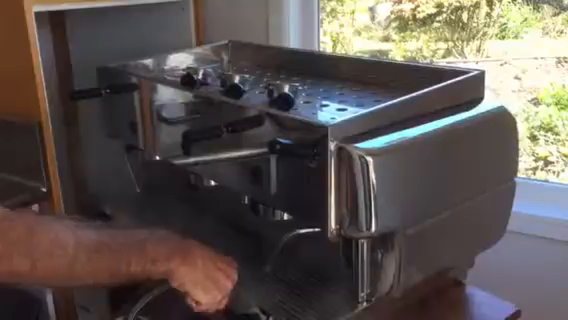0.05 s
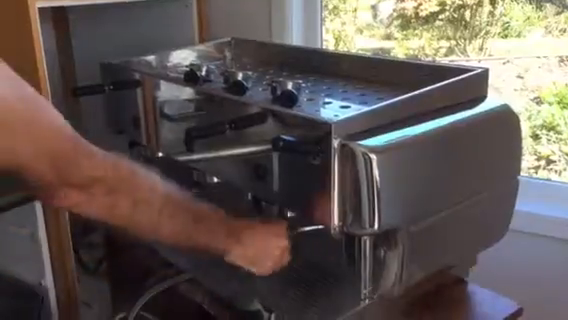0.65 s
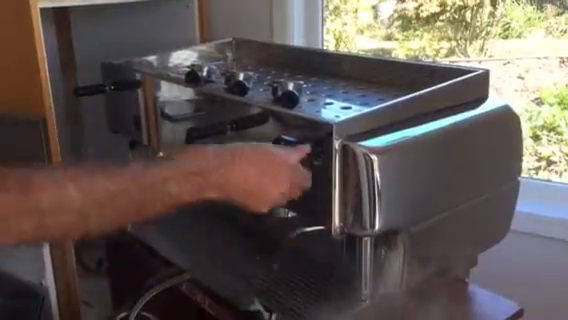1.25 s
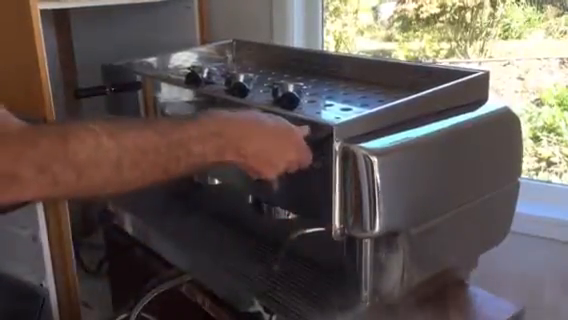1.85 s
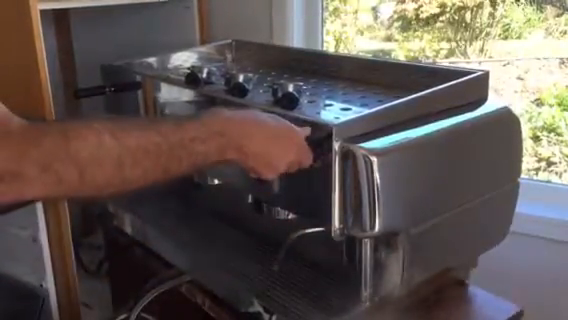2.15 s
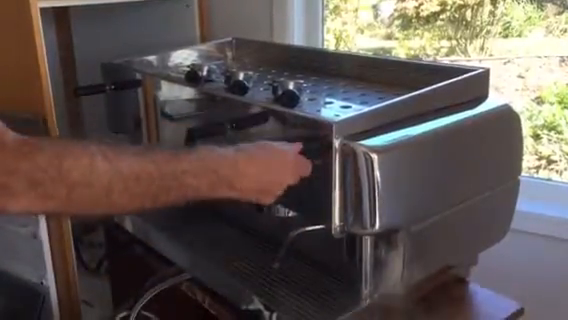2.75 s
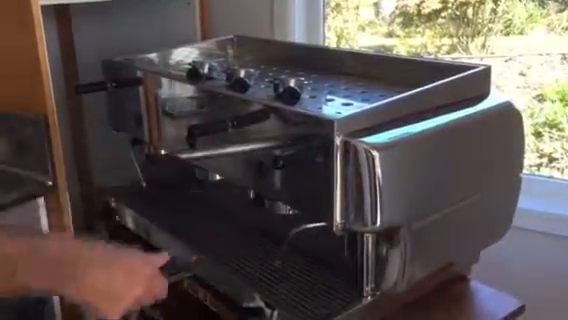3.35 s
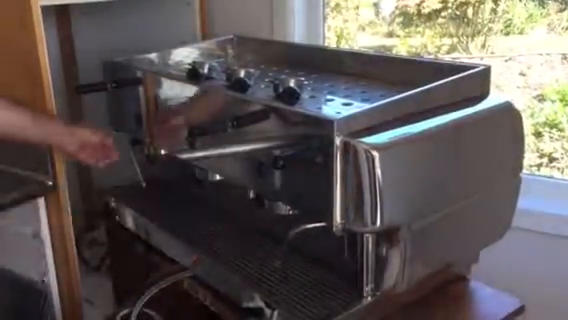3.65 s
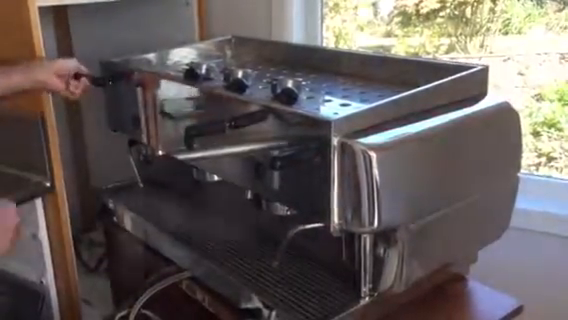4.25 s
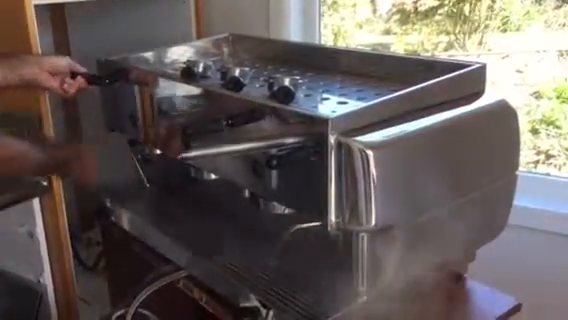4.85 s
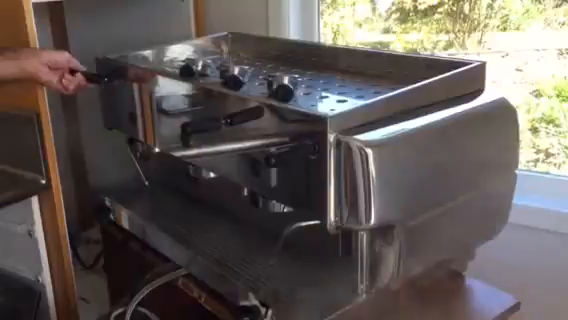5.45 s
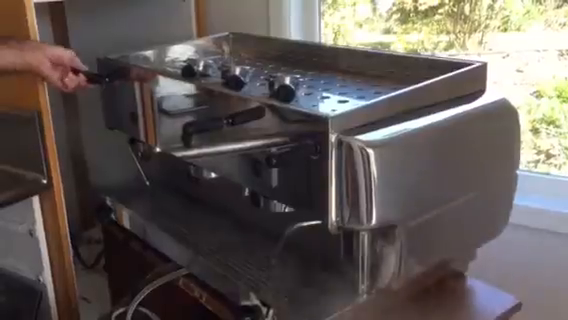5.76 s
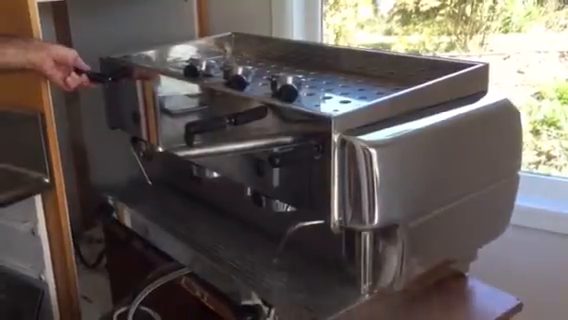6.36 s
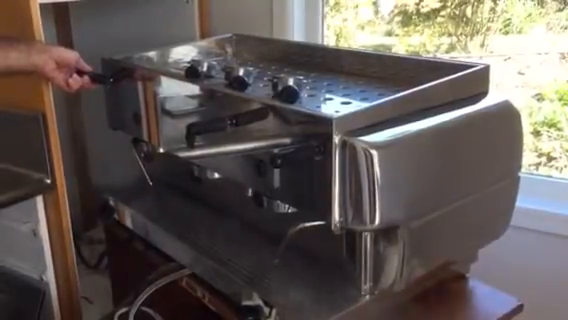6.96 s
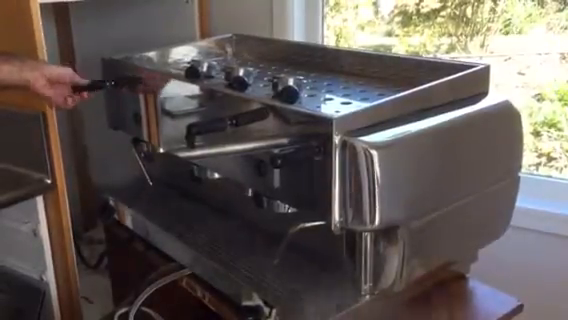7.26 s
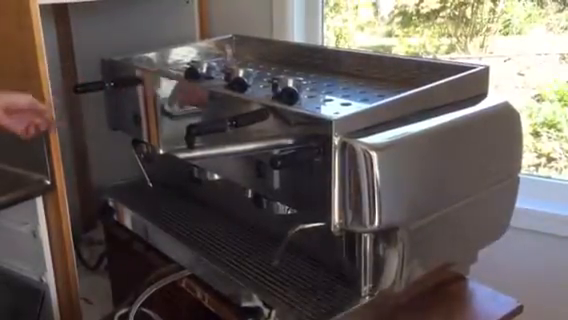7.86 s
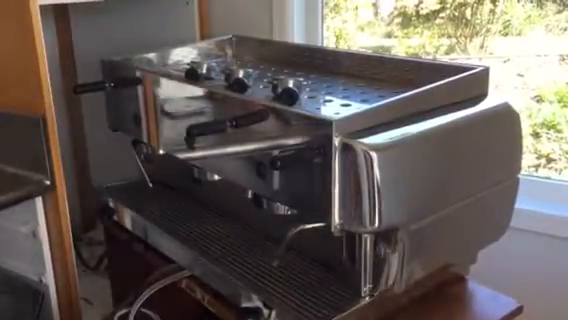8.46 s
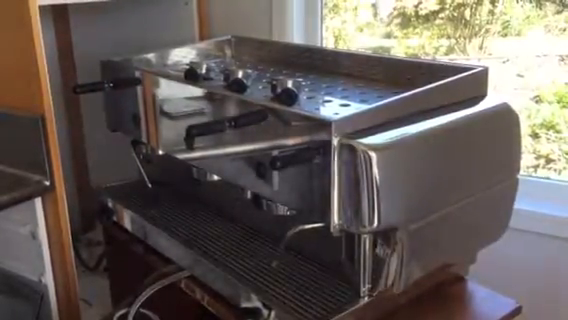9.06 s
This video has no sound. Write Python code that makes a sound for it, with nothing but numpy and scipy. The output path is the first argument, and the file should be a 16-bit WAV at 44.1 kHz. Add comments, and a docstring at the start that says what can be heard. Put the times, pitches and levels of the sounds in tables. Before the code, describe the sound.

An espresso machine lets off two loud jets of hissing steam, the second spitting water at first, with brief valve squeaks and pipe thuds.

```python
"""Espresso machine letting off steam

In a small hard room, steam roars from a tap until it is shut. A lever then lets out a second jet,
which spits water, clears to a bright hiss and closes with a cough. Slugs of water thud in the pipes,
the steel case booms under the jets, and the valves squeak as the pressure drains.
At the end the boiler is left simmering, and there are three light knocks on wood."""
import sys
import numpy as np
from scipy import signal
from scipy.fft import rfft, irfft, next_fast_len
from scipy.io import wavfile
from scipy.ndimage import map_coordinates

SR = 44100
rng = np.random.default_rng(int(sys.argv[2]) if len(sys.argv) > 2 else 0)


def generate_wav(sig):
    """Save sig (samples, or channels by samples) to the path in sys.argv[1] as 16-bit PCM at SR."""
    pcm = np.round(np.clip(np.atleast_2d(sig).T, -1, 1) * 32767).astype(np.int16)
    wavfile.write(sys.argv[1], SR, pcm)


N = 401310
TIME = np.arange(N) / SR

def amp(db):
    """Turn decibels into a gain to multiply by."""
    return np.exp(np.asarray(db) * np.log(10) / 20)

def unit(x):
    """Scale a sound to an average power of 1."""
    return x / np.sqrt(np.mean(x ** 2) + 1e-20)

def along(points, hz):
    """Read between (frequency, value) points, with octaves evenly spaced."""
    f, values = np.transpose(points)
    return np.interp(np.log(hz + 1), np.log(f + 1), values)

def since(s):
    """Seconds gone by since time s, zero before it."""
    return np.maximum(TIME - s, 0)

def wobble(rate):
    """A smooth curve through `rate` random values a second."""
    coarse = np.arange(0, N + 32, 32)
    curve = map_coordinates(rng.standard_normal(int(N * rate / SR) + 4), [coarse * rate / SR])
    return np.interp(np.arange(N), coarse, curve)

def burst(s, attack, t60):
    """A loudness curve that rises at time s and dies away; t60 is the time to fade by 60 dB."""
    out = np.zeros(N)
    start = round(s * SR)
    t = np.arange(min(N - start, round(2 * t60 * SR))) / SR
    out[start:start + len(t)] = (1 - np.exp(-t / attack)) * amp(-60 * t / t60)
    return out

def surge(s, rise, fall):
    """A loudness curve that swells to 1 at time s and falls off again."""
    t = TIME - s
    return np.exp(np.maximum(np.minimum(t / rise, -t / fall), -50))

def blend(a, b, share):
    """Fade from a (share 0) to b (share 1) at even power."""
    share = np.clip(share, 0, 1)
    return np.sqrt(1 - share) * a + np.sqrt(share) * b

def filtered(x, response):
    """Turn each frequency of x up or down by the gain response(frequency)."""
    size = next_fast_len(N + SR // 2)
    return irfft(rfft(x, size) * response(np.fft.rfftfreq(size, 1 / SR)), size)[..., :N]

def rush(colour, peaks=()):
    """Noise of power 1. Its colour sets the balance of low and high; peaks lift narrow bands."""
    size = next_fast_len(N)
    f = np.fft.rfftfreq(size, 1 / SR)
    peak_power = sum(3 * amp(db) ** 2 / (1 + (2 * (f - hz) / width) ** 2) for hz, width, db in peaks)
    shape = amp(along(colour, f)) * np.sqrt(1 + peak_power)
    real, imag = rng.standard_normal((2, len(f)))
    return unit(irfft((real + 1j * imag) * shape, size)[:N])

# Colours of the still room and the boiler: (frequency [Hz], relative level [dB])
AIR_COLOUR = [(25, -29.5), (60, -13.5), (100, -9), (145, -17.5), (222, -8.5), (300, -17.5), (500, -17),
              (1500, -24), (2400, -24), (3200, -27), (6000, -29.5), (8700, -29), (10500, -33),
              (15800, -36.5)]
BOILER_COLOUR = [(210, -47), (350, -28), (768, -13.5), (1170, -7), (1510, -8), (2140, -3), (2460, -5),
                 (4430, -9.5), (5100, -14.5), (10000, -32), (13000, -57), (22000, -120)]

def background():
    """Still air, a faint mains hum, and the boiler coming back to a simmer once the steam is drawn."""
    simmer = amp(-66.5) * (1 - np.exp(-since(7.2) / 0.39))
    boiler = simmer * amp(0.78 * wobble(30)) * rush(BOILER_COLOUR)
    low_colour = [(30, -28), (62, 11), (130, -13), (170, -2), (230, 1), (380, -2), (600, -28), (2000, -90)]
    seethe = simmer * amp(-16.5 + 4.5 * wobble(6.7)) * rush(low_colour)
    hum = amp(-80.5 + 2.02 * wobble(3)) * np.sin(2 * np.pi * 100 * TIME)
    return boiler + seethe + hum + amp(-70) * rush(AIR_COLOUR)

# How long the room rings: (frequency [Hz], time to fade by 60 dB [s])
ROOM_FADE = [(150, 0.29), (1500, 0.32), (12000, .25)]

def room(x):
    """The room's echo of x, which dies sooner in the treble."""
    hz, t, spectrum = signal.stft(rng.standard_normal(SR // 2), SR, nperseg=256)
    fade = amp(-60 * t / along(ROOM_FADE, hz)[:, None])
    tail = signal.istft(spectrum * fade, SR, nperseg=256)[1]
    return signal.fftconvolve(x, tail / np.linalg.norm(tail))[:N]

# The wood's own notes: (pitch [Hz], relative level [dB], time to fade by 60 dB [s])
WOOD_NOTES = [(166, -6.5, .14), (214, -4, 0.11), (303, -7, 0.13), (420, -11, .1), (557, -2, .09),
              (610, 0, .09), (960, -17, .1)]
# Light knocks on the woodwork: (time [s], ring level [dB], tick level [dB])
WOOD_KNOCKS = [(8.414, -48, -68), (8.538, -64, -60), (8.675, -59, -72)]

def knocks():
    """A soft blow makes the wood ring; a hard one mostly ticks."""
    t, out = np.arange(SR // 3) / SR, np.zeros(N)
    onset = 1 - np.exp(-t / 0.0072)
    for s, ring_db, tick_db in WOOD_KNOCKS:
        ring = sum(amp(db - 60 * t / t60) * np.sin(2 * np.pi * (hz * t + rng.random()))
                   for hz, db, t60 in WOOD_NOTES)
        tick = amp(-60 * t / .05) * rng.standard_normal(len(t))
        out[round(s * SR):][:len(t)] += amp(ring_db) * ring * onset + amp(tick_db) * tick
    return out

# Valve squeaks: (time [s], length [s], pitch [Hz], pitch spread [Hz], level [dB])
VALVE_SQUEAKS = [(2.692, .05, 1646, 220, -36.5), (2.968, 0.085, 1704, 258, -53.5),
                 (3.083, 0.041, 662, 70, -51), (3.15, .035, 660, 70, -57), (3.313, 0.044, 2170, 250, -67),
                 (3.653, 0.038, 1480, 280, -55.5), (3.76, .08, 2450, 400, -76),
                 (3.981, 0.028, 2760, 380, -35.5), (4.2, 0.094, 3140, 50, -49), (4.29, .25, 3010, 60, -46),
                 (4.41, 0.027, 498, 80, -35), (7.249, .08, 2055, 601, -35), (7.591, 0.076, 948, 238, -56),
                 (7.622, 0.14, 1740, 241, -55), (7.682, .115, 796, 75, -52.5)]

def squeaks():
    """Steam squeezing past a valve seat sings briefly: a breathy tone of unsteady pitch."""
    out = np.zeros(N)
    for s, length, hz, spread, db in VALVE_SQUEAKS:
        t = TIME[(TIME > s) & (TIME < s + length)] - s
        waver, strength = (map_coordinates(row, [t * 2 * spread]) for row in rng.standard_normal((2, 256)))
        pitch = hz + spread * waver / 2
        tone = amp(3.2 * strength) * np.sin(2 * np.pi * np.cumsum(pitch) / SR)
        swell = np.clip(np.minimum(t / 0.0064, (length - t) / 0.011), 0, 1)
        out[round(s * SR):][:len(t)] += amp(db) * tone * swell
    return out

CASE_NOTE_HZ, CASE_NOTE_FADE_S = 163, .65
# Colours of a thud and a cough: (frequency [Hz], relative level [dB])
THUD_COLOUR = [(25, -35.5), (42, -25), (62, -9), (125, -8), (165, -3), (200, -1), (240, -18.5), (310, -10),
               (400, -15), (600, -30.5), (1200, -100)]
COUGH_COLOUR = [(210, -41), (350, -15), (490, -7.5), (620, -2), (870, -1.5), (1200, -6), (1700, -4.5),
                (2100, -4), (2700, -2.5), (3300, -11), (6000, -10), (9000, -34.5), (13000, -90)]
# Slugs (plugs of water) pushed through the pipes: (time [s], thud [dB], case ring [dB],
# rumble [dB], cough [dB], time for thud and cough to fade by 60 dB [s])
WATER_SLUGS = [(0.0, -60, -73.5, -64, -50, .5), (0.61, -58, -81.5, -51.5, -56, 0.43),
               (2.705, -43.5, -37.5, -57, -35, 0.76), (2.915, -54, -51, -62, -60, .25),
               (3.125, -60, -69, -53, -55, .15), (3.982, -40, -46, -44, -30, 0.74),
               (4.15, -36, -28.5, -46, -30.5, 0.69), (4.222, -39.5, -53, -50, -54, 0.25),
               (4.41, -52, -58, -55, -35.5, 0.55), (4.745, -43, -41, -52, -33, 0.39),
               (5.74, -53, -61, -56, -43, .4), (7.243, -43, -47, -54, -26.5, 0.59),
               (7.365, -47, -47, -56, -45.5, 0.68)]

def slugs():
    """Each slug thuds in the pipes, rings the case's lowest note and coughs out of the nozzle."""
    thud, ring, cough = np.zeros((3, N))
    for s, thud_db, ring_db, _, cough_db, t60 in WATER_SLUGS:
        push = burst(s, attack=0.0082, t60=t60)
        thud += amp(thud_db) * push
        ring += amp(ring_db) * burst(s, attack=0.013, t60=CASE_NOTE_FADE_S)
        cough += amp(cough_db) * push
    note = np.sin(2 * np.pi * CASE_NOTE_HZ * TIME + 0.72 * wobble(25))
    return thud * rush(THUD_COLOUR) + ring * note + cough * rush(COUGH_COLOUR)

# The case's drone under wet and dry steam, and its rumble: (frequency [Hz], relative level [dB])
WET_DRONE = [(74, -43.5), (125, -18), (149, -7), (167, -4.5), (258, -7), (296, -7), (366, -11.5), (400, -8),
             (520, -30), (880, -120)]
DRY_DRONE = [(76, -50), (130, -20), (146, -6.5), (188, 2), (318, 0.5), (339, 5), (371, -15.5), (400, -8.5),
             (520, -38.5), (880, -120)]
CASE_RUMBLE = [(25, -35), (42, -26), (62, 2), (82, 2), (102, 4), (125, -11), (160, -31.5), (400, -90.5)]

def steel_case():
    """Steam and slugs make the hollow case boom and rumble; its drone changes as the steam dries."""
    tap, cold = tap_flow()
    lever, _ = lever_flow()
    boom_power = (tap * amp(-61.5 + 7.5 * cold) + lever * amp(-52)) ** 2
    rumble_power = (amp(-80) * (tap + lever)) ** 2
    for s, thud_db, _, rumble_db, _, _ in WATER_SLUGS:
        boom_power += (amp(thud_db + 1) * burst(s, attack=.015, t60=0.8)) ** 2
        rumble_power += (amp(rumble_db) * burst(s, attack=.02, t60=0.6)) ** 2
    wet_drone = rush(WET_DRONE, peaks=[(162.4, 9, 1.2), (231, 11, 1.2)])
    dry_drone = rush(DRY_DRONE, peaks=[(156.5, 10, -1.5), (205, 22, -4.5)])
    drone = blend(wet_drone, dry_drone, share=(TIME - 4.9) / 0.39)
    return np.sqrt(boom_power) * drone + np.sqrt(rumble_power) * rush(CASE_RUMBLE)

def panels(jet, echo_db, fade_s):
    """Many quick echoes off steel panels and near walls make a jet sound slightly hollow."""
    t = np.arange(SR // 8) / SR
    cut_lows = signal.butter(2, 1200, "high", fs=SR, output="sos")
    echoes = signal.sosfilt(cut_lows, rng.standard_normal(len(t)))
    echoes *= (1 - np.exp(-t / 0.0014)) * np.exp(-t / fade_s)
    bounced = signal.fftconvolve(jet, echoes / np.linalg.norm(echoes))[:N]
    return (jet + amp(echo_db) * bounced) / np.hypot(1, amp(echo_db))

def turbulence(hiss, depth_db, rate, band_hz=508):
    """Swirling steam shifts a jet's colour: each band of frequencies swells and ebbs on its own."""
    hz, t, spectrum = signal.stft(hiss, SR, nperseg=512)
    grid = rng.standard_normal((int(hz[-1] / band_hz) + 4, int(t[-1] * rate) + 4))
    swell = map_coordinates(grid, np.meshgrid(hz / band_hz, t * rate, indexing="ij"))
    return unit(signal.istft(spectrum * amp(depth_db * swell), SR, nperseg=512)[1][:N])

def shut_db(s, drain_db_per_s, step_db=5, travel_s=0.044):
    """A valve shuts at time s: the flow steps down while it moves, and the pipe drains steadily."""
    return -step_db * np.minimum(since(s) / travel_s, 1) - drain_db_per_s * since(s)

# The roar of a nearly empty pipe: (frequency [Hz], relative level [dB])
DRAIN_COLOUR = [(240, -43), (400, -21), (526, -13.5), (671, -4), (738, -10), (951, -4), (1240, -5.5),
                (1680, -5), (2120, -6), (2620, -7), (4000, -13), (5000, -26), (6500, -40), (11000, -120)]

def draining(gain, full_roar, full_db):
    """As the pressure falls, the roar loses its bright core and the low pipe tones remain."""
    low_roar = rush(DRAIN_COLOUR, peaks=[(900, 40, 1), (1700, 78, -1)])
    return gain * blend(low_roar, full_roar, share=(gain / amp(full_db)) ** 0.42)

TAP_SHUT_S, TAP_WARM_S = 2.707, 1.0

def tap_flow():
    """The flow of the tap, open from the start, and how cold and wet its pipe still is (both 0-1)."""
    return amp(shut_db(TAP_SHUT_S, drain_db_per_s=56)), np.exp(-since(0) / TAP_WARM_S)

# The tap's roar and hiss, at first and once settled: (frequency [Hz], relative level [dB])
TAP_FIRST_ROAR = [(220, -46), (380, -15.5), (673, -10), (853, -9), (981, -7.5), (1080, -10.5), (1360, -6.5),
                  (1810, -6.5), (3010, -2.5), (5000, -5.5), (6500, -32), (11000, -120)]
TAP_SETTLED_ROAR = [(240, -36.5), (400, -16.5), (567, -18), (671, -8), (762, -11.5), (972, -5.5),
                    (1090, -9.5), (1160, -6), (1830, -4), (3280, 1), (4590, -1.5), (5000, -2),
                    (6500, -31.5), (11000, -120)]
TAP_FIRST_HISS = [(2940, -30.5), (5000, -5), (5910, -5.5), (6680, -1), (7600, -5), (8940, -2),
                  (10300, -5.5), (11100, -2.5), (13500, 0), (15600, -5)]
TAP_SETTLED_HISS = [(2940, -39), (5000, -2.5), (6500, 1), (7640, -2.5), (9150, 1), (10400, -3),
                    (12200, 2.5), (13700, -3), (15000, 2), (15600, -4)]
# Narrow peaks that colour the tap's roar: (frequency [Hz], width [Hz], strength [dB])
TAP_ROAR_PEAKS = [(890, 22, -8), (2040, 20, 2), (2250, 28, -5.5), (2410, 32, -5), (2700, 45, -12),
                  (2947, 24, -3.5), (3230, 22, -13.5), (3380, 18, -1), (3700, 37, -1.5), (4430, 30, -13.5),
                  (4710, 22, 1), (4760, 16, -1)]

def tap_jet():
    """A steady jet: pipe roar under a hiss, both changing colour as the hand lets go of the spout."""
    flow, cold = tap_flow()
    settled = (TIME - .52) / 0.22
    first_roar = rush(TAP_FIRST_ROAR, peaks=[(3030, 90, -1.5), (3330, 30, -3.0), (3830, 60, 3.0)])
    pipe = blend(first_roar, rush(TAP_SETTLED_ROAR, TAP_ROAR_PEAKS), settled)
    # The spout's main resonance swells and ebbs on its own.
    core = filtered(pipe, lambda f: np.exp(-((f - 3400) / 450) ** 2))
    pipe += (amp(1.2 * wobble(2.9)) - 1) * core
    nozzle = blend(rush(TAP_FIRST_HISS), rush(TAP_SETTLED_HISS), settled)
    hiss = flow * amp(-26) * turbulence(nozzle, depth_db=1.1, rate=4)
    # The valve leaks a thin hiss that fades more slowly than the jet.
    thin_hiss = rush([(3000, -29.5), (7000, -15), (12000, -0.5), (15600, -4.5)])
    leak = amp(-44 - 36 * since(TAP_SHUT_S)) * thin_hiss
    flutter = amp(0.29 * wobble(45))
    roar = draining(flow * amp(-28 - 2 * cold), pipe, full_db=-36.5)  # builds as the pipe warms
    return flutter * (roar + hiss + leak)

LEVER_OPEN_S, LEVER_CLEAR_S, LEVER_SHUT_S, LEVER_SEALED_S = 3.977, 4.125, 7.257, 7.625

def lever_flow():
    """The lever's flow, dying faster once the valve seals, and how wet its steam is (both 0-1)."""
    opening = (1 - np.exp(-since(LEVER_OPEN_S) / 0.0037)) ** 2
    closing_db = shut_db(LEVER_SHUT_S, drain_db_per_s=32) - 51 * since(LEVER_SEALED_S)
    return opening * amp(closing_db), burst(LEVER_OPEN_S, attack=.01, t60=5.0)

# The lever's roar, sizzle, water spray and hiss: (frequency [Hz], relative level [dB])
ROAR_COLOUR = [(240, -47), (400, -8), (505, -4), (549, -7), (762, -2), (1040, -4.5), (1140, 0.5),
               (1350, -3), (1680, 0.5), (2150, 0), (2460, 2), (4360, 1), (5000, -3.5), (6500, -33),
               (11000, -120)]
SIZZLE_COLOUR = [(2940, -33), (5000, -6.5), (6070, -1.5), (7230, 0), (9000, -3), (11700, -34.5),
                 (19800, -120)]
SPRAY_COLOUR = [(2940, -33), (4300, -14), (5100, -10), (5700, -1.5), (6700, -1), (8200, -3.5), (9500, -13),
                (12000, -30.5), (19800, -120)]
HISS_COLOUR = [(5290, -41.5), (9000, -2), (9710, 1), (10500, -1.5), (13200, 1), (15600, -3)]
# Narrow peaks that colour its roar and hiss: (frequency [Hz], width [Hz], strength [dB])
LEVER_ROAR_PEAKS = [(757, 30, -5.5), (930, 39, -3), (1680, 30, -3), (2520, 36, -4), (3460, 27, -3),
                    (4460, 41, -9), (4754, 18, -3)]
LEVER_HISS_PEAKS = [(9800, 350, -7), (11100, 400, -5), (13100, 240, -3)]
# Spits of steam breaking through water: (time [s], level [dB])
STEAM_SPITS = [(3.988, -29.5), (4.097, -25.5), (8.0, -69)]
# Water torn to mist at the nozzle: (peak time [s], rise [s], fall [s], spray [dB], hiss [dB])
SPRAY_SURGES = [(4.72, 0.31, .045, -29, -31), (5.01, 0.028, .02, -24.5, -43.5)]

def lever_jet():
    """Wet steam spits, sizzles and sputters at first, then dries to an even hiss."""
    flow, wetness = lever_flow()
    # Water in the pipe chokes the jet until it is blown clear; the lower sounds feel it less.
    choke_db = -14.5 * np.exp(-since(LEVER_CLEAR_S) / .042)
    pinch_db = 3.5 * surge(LEVER_SHUT_S, rise=.045, fall=.015)  # closing briefly lifts the hiss
    spits = sum(amp(db) * burst(s, attack=0.0049, t60=0.092) for s, db in STEAM_SPITS)
    spray, wet_hiss = np.zeros((2, N))
    for s, rise, fall, spray_db, hiss_db in SPRAY_SURGES:
        swell = surge(s, rise, fall)
        spray += amp(spray_db) * swell
        wet_hiss += amp(hiss_db) * swell
    roar_db = -38 + 1.22 * since(LEVER_OPEN_S) + 3.5 * wetness + .55 * choke_db
    roar = draining(flow * amp(roar_db), rush(ROAR_COLOUR, LEVER_ROAR_PEAKS), full_db=-38)
    droplets = flow * amp(0.63 * choke_db)
    sizzle = np.hypot(droplets * amp(-32.5), amp(-0.5) * spits) * rush(SIZZLE_COLOUR)
    mist = droplets * spray * rush(SPRAY_COLOUR)
    hiss_flow = flow ** 1.17  # the hiss dies faster than the flow
    hiss_gain = hiss_flow * amp(choke_db + pinch_db) * np.hypot(amp(-28.5), wet_hiss)
    hiss = np.hypot(hiss_gain, spits) * rush(HISS_COLOUR, LEVER_HISS_PEAKS)
    sputter = amp((0.18 + 0.66 * wetness) * wobble(70))
    return sputter * (roar + sizzle + mist + hiss)

def scene():
    """Everything heard from one spot, alike in both ears."""
    tap = panels(tap_jet(), echo_db=-7.5, fade_s=0.017)
    lever = panels(lever_jet(), echo_db=-8.5, fade_s=0.027)
    small_sounds = squeaks() + knocks()
    machine = tap + lever + steel_case() + slugs() + small_sounds
    mono = machine + amp(-2.5) * room(small_sounds) + background()
    return np.array([mono, mono])

def record(dry):
    """The treble has two narrow dips, and nothing is left above 15900 Hz."""
    def dip(f, hz, width, db):
        return amp(db * np.exp(-((f - hz) / width) ** 2))

    def response(f):
        top_edge = np.sin(np.pi / 2 * np.clip((15900 - f) / 220, 0, 1)) ** 2
        return dip(f, hz=4910, width=164, db=-4.5) * dip(f, hz=10360, width=250, db=-1.5) * top_edge

    return filtered(dry, response)

dry = scene()
out = record(dry)
generate_wav(out)
```